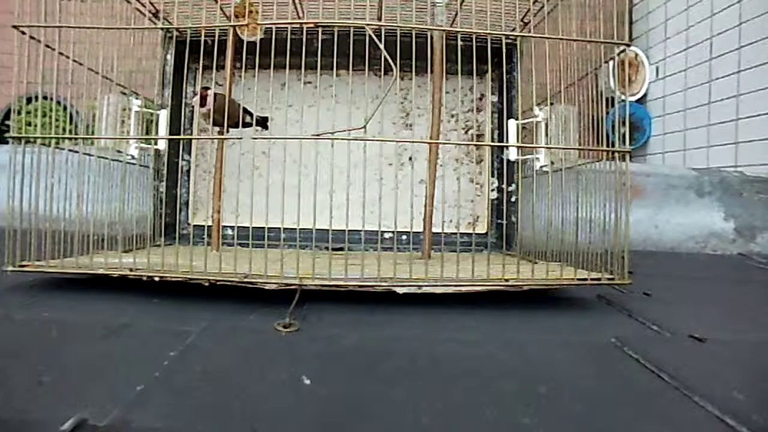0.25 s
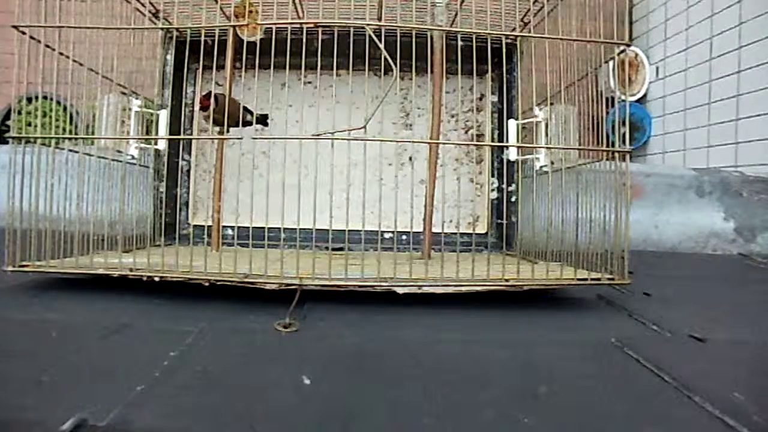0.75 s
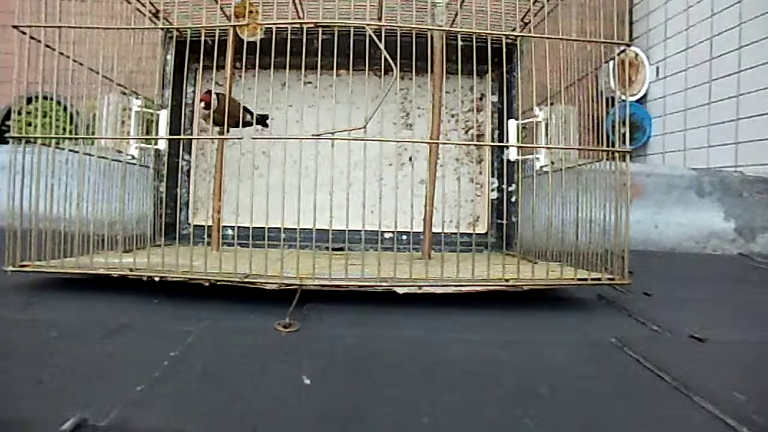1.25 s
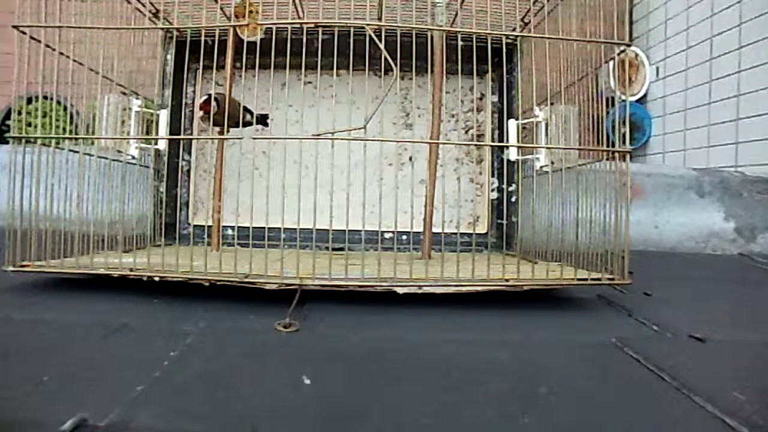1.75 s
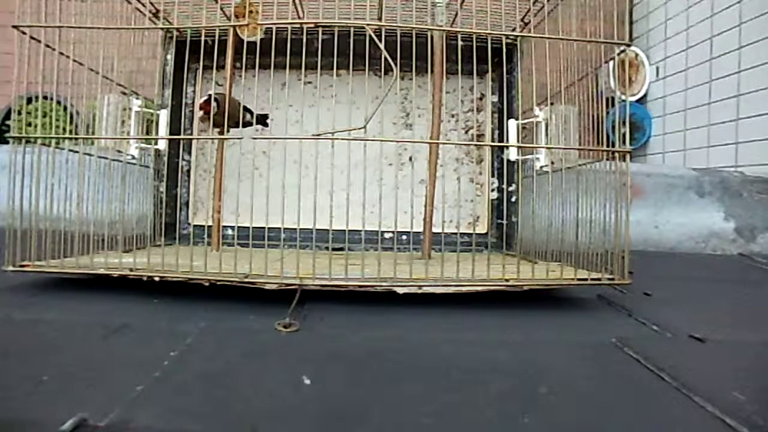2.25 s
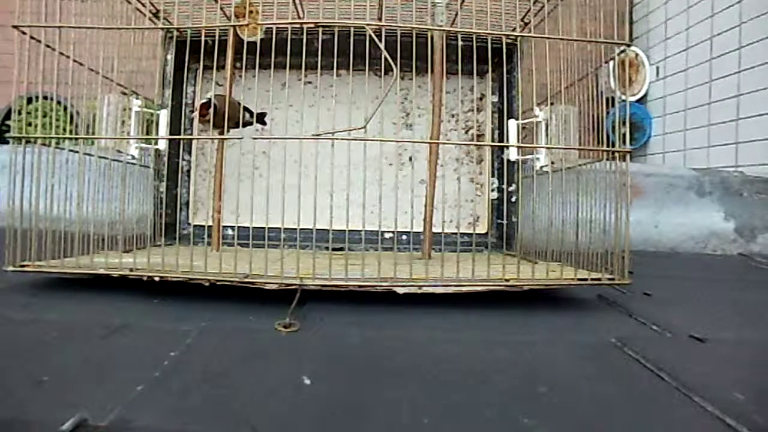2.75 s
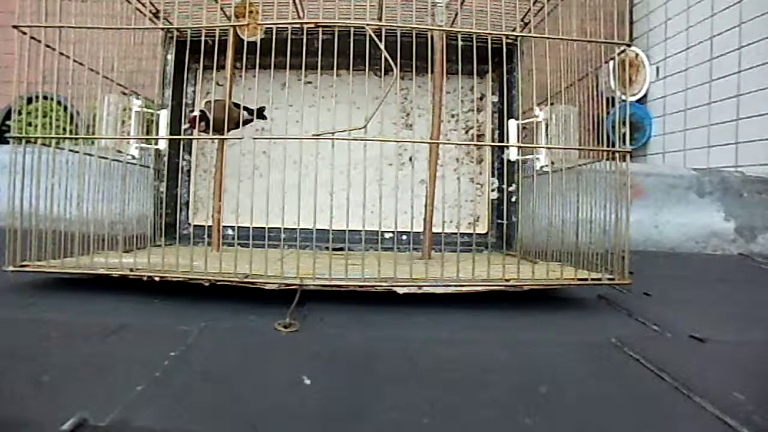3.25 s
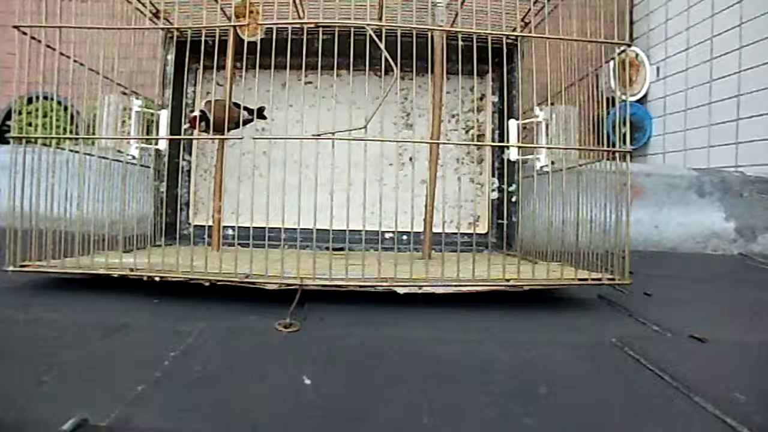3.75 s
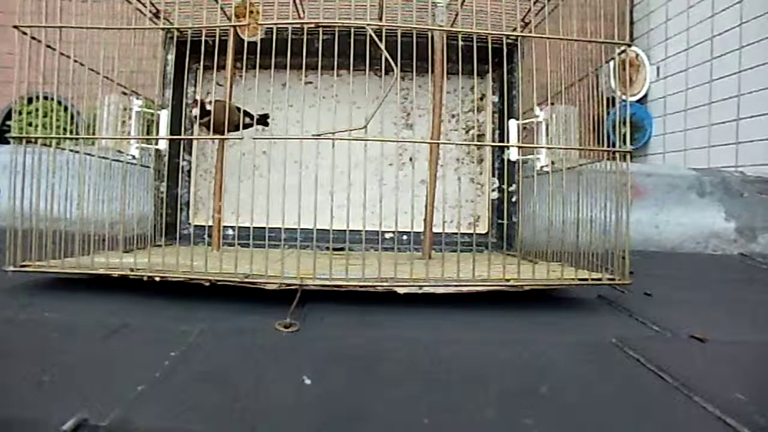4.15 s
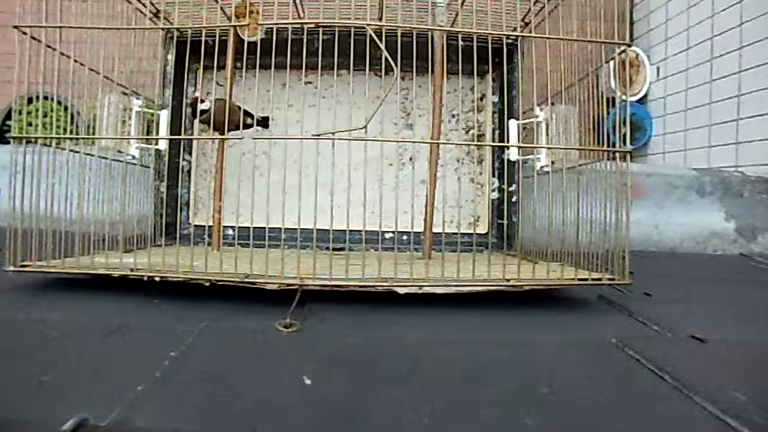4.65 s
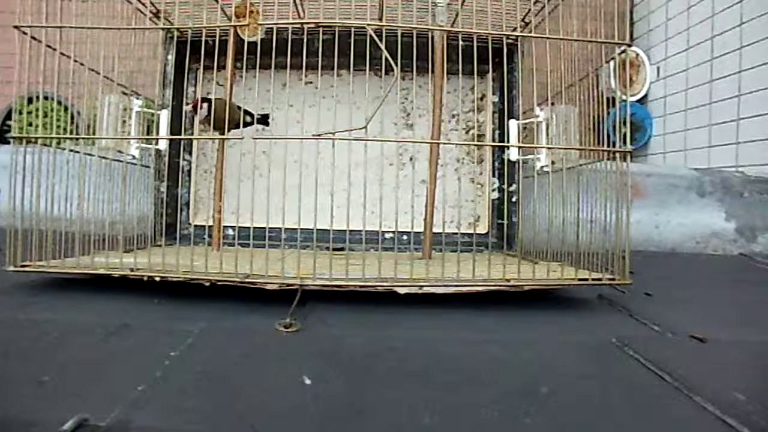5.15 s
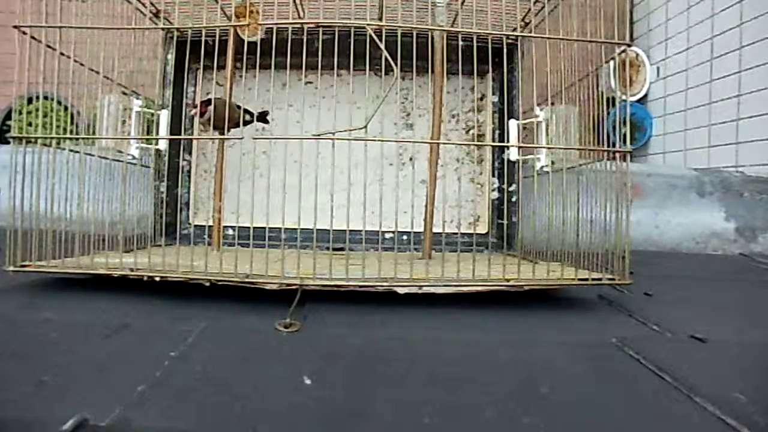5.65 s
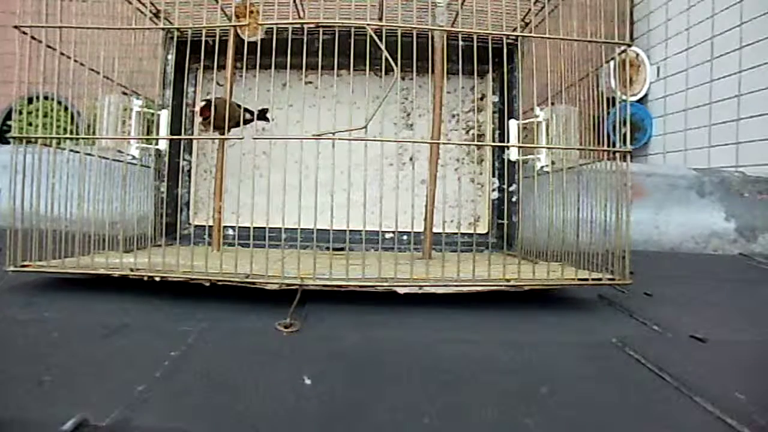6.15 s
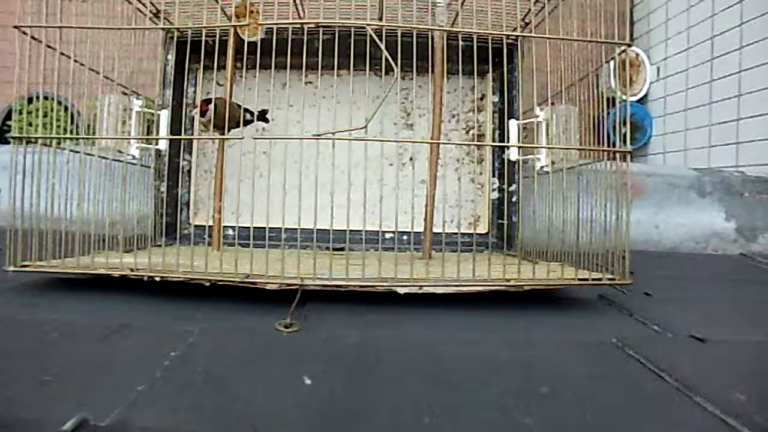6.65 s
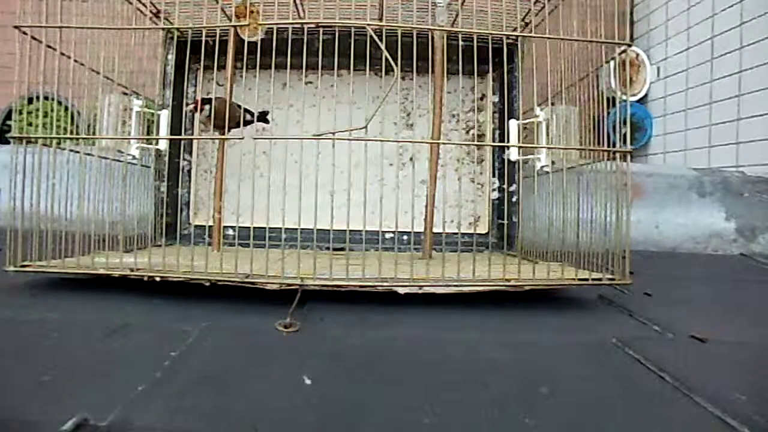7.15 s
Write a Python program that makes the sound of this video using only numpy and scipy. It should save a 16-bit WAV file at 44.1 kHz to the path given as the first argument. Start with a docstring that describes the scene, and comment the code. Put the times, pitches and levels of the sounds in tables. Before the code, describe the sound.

A caged finch close by sings a short burst of falling chirps, pauses, then a long fast twittering phrase over faint town hiss and rumble.

```python
"""A caged finch sings two phrases of fast twitter on a balcony, close by, from inside a falling sweep.
Its syrinx has two sides that whistle near-sines, at times together, with overtones and sum tones.
Cage and parapet comb the song with early echoes; random decaying taps make the reverberation.
Faint chirps are blurred glides (the first two likely a distant wall's echo of the sweep, others far birds);
town hiss and thudding air are shaped noise, an engine is a sine, converter grit rises with loud notes."""
import sys
import numpy as np
from scipy import signal
from scipy.fft import rfft, irfft, next_fast_len
from scipy.io import wavfile
from scipy.ndimage import uniform_filter1d

SR = 44100
rng = np.random.default_rng(int(sys.argv[2]) if len(sys.argv) > 2 else 0)


def wav_out(sig):
    """Save sig, one row per channel (or a flat mono array), as 16-bit PCM at SR to the path in sys.argv[1]."""
    wavfile.write(sys.argv[1], SR, np.round(np.clip(np.atleast_2d(sig).T, -1, 1) * 32767).astype(np.int16))


def volts_from_decibels(level):
    """Turn decibel levels (scalar or array-like) into linear amplitude factors."""
    exponent = np.asarray(level, float) / 20
    return 10 ** exponent


N = 325891

# flick-and-sweep syllables: (flick start [s], sweep length factor [1], level change [dB])
SWEEP_TIMES = [(-0.023, 0.99, 0.5), (0.171, 1.074, -0.55), (0.379, 1.006, -0.2), (0.566, 1.02, -0.5),
               (5.337, 1.05, 0.2), (5.53, 1.006, -0.5), (5.718, 1.04, -0.5), (5.916, 1.035, -0.3),
               (6.11, 1.065, -1.2)]
SWEEP_LAG_S = 0.0102  # from the flick's start to the sweep's start
# reverberation of the walls: (frequency [Hz], time to decay by 60 dB [s])
WALL_DECAY = [(2000, 0.14), (3200, 0.5), (3900, 0.56), (4600, 0.6), (5200, 0.54), (6000, 0.38),
              (8000, 0.15), (12000, 0.2)]


def evened(x):
    """Normalization: scales a signal to rms 1."""
    return x / np.sqrt(np.mean(x ** 2) + 1e-20)


def read(points, hz):
    """Interpolation on a logarithmic frequency axis."""
    f, value = np.transpose(points)
    return np.interp(np.log(hz + 1), np.log(f + 1), value)


def colour(x, points):
    """Linear filtering: weights the spectrum by a curve of (frequency [Hz], gain [dB])."""
    size = next_fast_len(N)
    hz = np.fft.rfftfreq(size, 1 / SR)
    return irfft(rfft(x, size) * volts_from_decibels(read(points, hz)), size)[:N]


def drift(hz):
    """Low-pass noise: slow chance up to about hz, rms 1."""
    return evened(signal.lfilter(*signal.butter(2, hz, fs=SR), rng.standard_normal(N)))


def walls(x, decay, first=300):
    """Diffuse reverberation: sparse random-sign taps from sample `first`, each band decaying at its rate."""
    taps = np.zeros(SR)
    at = np.arange(int(first), SR - 20, 20)  # one tap in every 20 samples
    taps[at + rng.integers(0, 20, len(at))] = rng.choice([-1., 1.], len(at))
    hz, t, z = signal.stft(taps, SR, nperseg=256)
    fade = volts_from_decibels(-60 * t / read(decay, hz)[:, None])
    tail = signal.istft(z * fade, SR, nperseg=256)[1]
    return signal.fftconvolve(x, tail / np.linalg.norm(tail) * 2)[:N]


def glide(shape, start_s, length_s, first_hz, last_hz, db, rich_db=0):
    """Frequency glide: pitch moves exponentially to its goal while level bends at one turning point."""
    # low notes come out weaker: (frequency [Hz], gain [dB])
    low_voice = [(1700, -13), (2300, -12), (2900, -0.5)]
    flatness = 1.85  # higher: flatter at the turning point, steeper at the ends
    settle, top, start_db, end_db = shape
    u = np.linspace(0, 1, num=17)
    top = np.clip(top, .05, .95)
    hz = first_hz + (last_hz - first_hz) * np.expm1(-settle * u) / np.expm1(-settle)
    distance = abs(u - top) / np.where(u < top, top, 1 - top)
    swell_db = np.where(u < top, start_db, end_db) * distance ** flatness
    return rich_db, np.transpose([start_s + length_s * u, hz, db + swell_db + read(low_voice, hz)])


def whistle(notes, factor, edge_s=0.0018):
    """Phasor synthesis: near-sine notes whose phase is the running sum of their frequency.

    Returns the summed phasors, their size, mean pitch, overtone size and each note's own octave."""
    tone, size, pitch = np.zeros(N, complex), np.full(N, 1e-9), np.zeros(N)
    rich, octave = np.zeros(N), np.zeros(N)
    for rich_db, rows in notes:
        s, hz, db = np.transpose(rows)
        at = np.arange(max(round((s[0] - edge_s) * SR), 0), min(round((s[-1] + edge_s) * SR), N))
        t = at / SR
        inside = np.minimum(t - s[0], s[-1] - t)
        soft = np.sin(np.pi / 2 * np.clip(inside / (2 * edge_s) + .5, 0, 1)) ** 2
        a = soft * volts_from_decibels(np.interp(t, s, db)) * np.sqrt(2)  # peak of a sine from its rms
        f = np.interp(t, s, hz) * factor[at]
        phasor = np.exp(2j * np.pi * (np.cumsum(f) / SR + rng.random()))
        tone[at] += a * phasor
        octave[at] += a * volts_from_decibels(rich_db) * (phasor ** 2).real
        size[at] += a
        pitch[at] += a * f
        rich[at] += a * volts_from_decibels(rich_db)
    return tone, size, pitch / size, rich, octave


def town():
    """Hiss of far traffic as filtered noise: time-frequency patches drift, low and middle swell slowly."""
    # spectrum of the hiss: (frequency [Hz], relative density [dB per Hz])
    hiss_spectrum = [(35, -12), (60, -0.5), (142, -6.5), (294, -10), (437, -14.5), (480, -10), (607, -16.5),
                     (882, -13.5), (1510, -20.5), (2900, -23.5), (3580, -29.5), (14600, -41.5),
                     (16000, -48)]
    # course of the low and middle hiss, used about its mean: (time [s], relative level [dB])
    hiss_swell = [(0.0, -61.5), (1.36, -61.5), (2.75, -64.5), (2.9, -62.5), (3.3, -64), (4.88, -68.5),
                  (5.64, -66.5), (7.39, -67.5)]
    frames, hz = N // 256 + 5, np.fft.rfftfreq(1024, 1 / SR)
    a, b, patches = rng.standard_normal((frames, 513, 3)).T
    patches = uniform_filter1d(patches, 8, 0)  # smooth over frequency
    patches = evened(uniform_filter1d(patches, 20, 1))  # then over time
    s, db = np.transpose(hiss_swell)
    swell_db = np.interp(np.arange(frames) * 256 / SR, s, db - db.mean())
    share = read([(1200, 1), (4000, 0.39)], hz)[:, None]  # the treble swells less
    level_db = read(hiss_spectrum, hz)[:, None] + 0.72 * patches + share * swell_db
    hiss = signal.istft((a + 1j * b) * volts_from_decibels(level_db), nperseg=1024, noverlap=768)[1][:N]
    return volts_from_decibels(-60) * evened(hiss)


def rumble():
    """A far engine's low sine, frequency-modulated and climbing overall, over low-pass noise of thudding air."""
    # engine tone: (time [s], pitch [Hz], level [dB])
    engine = [(3.7, 39.1, -55), (4.17, 43.05, -53.5), (5.61, 42.06, -53), (6.0, 42.3, -75),
              (6.1, 45.2, -53.5), (6.42, 48.9, -47.5), (6.59, 48.1, -51.5), (6.72, 48.4, -60),
              (6.9, 52.6, -54.5), (7.21, 54.4, -55.5), (7.39, 52.9, -55)]
    # thudding air: (time [s], level [dB])
    air_level = [(0.0, -54), (1.44, -57.5), (3.19, -53.5), (3.7, -53), (4.14, -58), (5.99, -56),
                 (7.39, -61)]
    t = np.arange(N) / SR
    s, hz, db = np.transpose(engine)
    turns = np.cumsum(np.interp(t, s, hz) * (1 + 0.025 * drift(5.1))) / SR
    fade_in = np.clip((t - s[0]) / 0.1, 0, 1)
    drone = np.sqrt(2) * volts_from_decibels(np.interp(t, s, db)) * fade_in * np.sin(2 * np.pi * turns)
    air_spectrum = [(8, -35), (18, 1.0), (32, 1), (55, -6.5), (90, -15), (200, -81)]
    air = evened(colour(rng.standard_normal(N), air_spectrum))
    return drone + volts_from_decibels(np.interp(t, *np.transpose(air_level))) * air


def faint_chirps():
    """Diffuse blurring: soft-edged wavering glides, faint, with reverberation added."""
    # faint chirps, the first two likely a distant wall's echo of the sweep, the others of far birds:
    # (start [s], length [s], first pitch [Hz], last pitch [Hz], relative level [dB])
    chirp_rows = [(0.763, .013, 3670, 4200, -51.5), (0.903, .025, 4300, 3970, -65),
                  (1.157, 0.024, 2670, 3180, -56), (1.161, .015, 5700, 6300, -69.5),
                  (1.192, .04, 4770, 4390, -67.5), (1.263, 0.043, 3070, 3240, -66),
                  (1.872, 0.03, 2590, 3050, -67), (3.5, 0.056, 2760, 2890, -71),
                  (3.717, 0.077, 4660, 4470, -73), (6.787, 0.019, 2990, 3200, -53)]
    # long thin whistles of far birds:
    # (start [s], length [s], first pitch [Hz], last pitch [Hz], relative level [dB])
    whistle_rows = [(2.37, .1, 5230, 4880, -80), (2.96, .12, 5330, 5500, -79), (3.27, .06, 5050, 4450, -77)]
    # course of a glide: (settling rate, negative = ever faster [1], level's turning point, held
    # within 0.05-0.95 [share of length], start level [dB], end level [dB])
    chirp_shape = (2.5, 1.2, 5, -15)
    whistle_shape = (-.8, .5, -5, -4)
    notes = [glide(chirp_shape, *row) for row in chirp_rows]
    notes += [glide(whistle_shape, *row) for row in whistle_rows]
    chirps = whistle(notes, 1 + 0.01 * drift(300), edge_s=.008)[0].real
    return volts_from_decibels(-1) * chirps + volts_from_decibels(-18) * walls(chirps, WALL_DECAY)


def place(shape, start_s, db, length=1):
    """Time scaling: sets a syllable at a time and level, stretched by a length factor."""
    return [(start_s + length * u, hz, level + db) for u, hz, level in shape]


def syllable_part(shape, start_s, change_db, part):
    """Repetition: one part of a repeated syllable as a glide with its own level change."""
    length_s, first_hz, last_hz, db, rich_db = part
    return glide(shape, start_s, length_s, first_hz, last_hz, db + change_db, rich_db)


def song():
    """Pitch and level contours: every note of the finch, and one faint late echo at 4.923 s."""
    # glides: (start [s], length [s], first pitch [Hz], last pitch [Hz], relative level [dB],
    # overtone strength [dB])
    slides = [(4.141, 0.023, 2210, 2470, -42, 9), (4.171, 0.022, 2590, 3047, -33.5, 2),
              (4.186, 0.033, 3670, 4750, -41, 3), (4.219, 0.02, 4170, 4780, -35.5, -7),
              (4.259, .041, 3880, 2710, -43.5, 8), (4.288, .019, 4040, 3490, -32, 1.5),
              (4.9, 0.016, 2200, 3950, -36, 8), (4.905, 0.013, 2620, 3060, -45, 16),
              (5.228, 0.018, 5530, 6900, -35.5, -5), (5.229, 0.032, 2574, 5300, -37, 18),
              (6.436, 0.019, 5880, 8270, -54.5, 26)]
    hooks = [(3.872, .035, 3250, 5570, -42, 8.5), (3.875, 0.028, 2935, 4890, -40.5, 10),
             (4.082, 0.028, 5450, 5075, -32, -3.5), (4.109, 0.027, 4390, 1610, -42, -1.4),
             (4.11, 0.026, 4800, 3610, -39.5, 5), (4.36, 0.02, 5620, 6830, -35, 5),
             (4.477, .016, 2670, 3175, -31.5, -1), (4.554, 0.037, 3600, 5370, -33, -4.5),
             (4.858, .028, 6600, 5470, -47, 18.5), (4.938, 0.046, 3210, 5350, -34, 2),
             (4.955, .03, 4330, 4830, -41.5, 7)]
    # the same columns; the row at 4.923 s is the faint late echo
    holds = [(4.01, 0.032, 6400, 6100, -33, -8.5), (4.152, 0.016, 3540, 3720, -40, 5),
             (4.692, 0.029, 4200, 4220, -49.5, 13), (4.858, 0.047, 8520, 6330, -33.5, -10),
             (4.923, 0.017, 6530, 6280, -58, -18), (5.037, 0.066, 5400, 5330, -35.5, 4.5),
             (5.246, 0.029, 5600, 6323, -27.5, -11)]
    # parts of repeated syllables: the same columns without the start
    flick_part = (.01, 5900, 9060, -33.5, 4)
    down_part = (.021, 4134, 2780, -33.5, 3.5)
    up_part = (.021, 4540, 5330, -33, -3.5)
    # course of each kind: (settling rate [1], level's turning point, held within 0.05-0.95
    # [share of length], start level [dB], end level [dB])
    slide_shape = (0.16, 1, -8.5, -14)
    hook_shape = (2, 0.62, -6, -17.5)
    hold_shape = (5, 0.5, -9, -16)
    flick_shape = (.1, .5, -10.5, -7)
    down_shape = (.6, .25, -16, -6)
    up_shape = (1.2, .25, -10.5, -7)
    # the long falling sweep: (time from its start [s], pitch [Hz], relative level [dB])
    sweep_shape = [(0, 6700, -74), (.01, 6100, -40), (.018, 5537, -35), (.027, 4860, -36.5),
                   (.037, 4460, -33), (.047, 4120, -32), (.072, 3510, -32.5), (.083, 3170, -37),
                   (.095, 2846, -36.5), (.128, 2270, -56.5)]
    # trills, a down note then an up note: (start [s], level change [dB])
    trills = [(6.864, -1), (6.936, -0.3), (7.009, 0.4), (7.079, 0.6), (7.15, 0.2), (7.223, 0.3),
              (7.296, 0.8), (7.369, 3)]
    # freely bent notes: (overtone strength [dB], rows of (time [s], pitch [Hz], relative level [dB]))
    bends = [(-1, [(3.953, 2660, -45), (3.967, 3010, -41), (3.978, 3400, -36.5), (3.986, 4630, -35.5),
             (3.994, 5260, -39.5), (4.002, 5060, -50)]), (-1, [(4.238, 8500, -50), (4.242, 7140, -39),
             (4.246, 7530, -34), (4.252, 7250, -47), (4.26, 5740, -49), (4.27, 4800, -42),
             (4.285, 4620, -40)]), (-1.5, [(4.364, 5150, -48), (4.372, 5690, -41), (4.392, 5710, -32),
             (4.41, 5640, -39), (4.43, 5650, -45.5)]), (-3.5, [(4.6, 6000, -44), (4.613, 6230, -32.5),
             (4.635, 6020, -47), (4.655, 5600, -44.5), (4.668, 5116, -25.5), (4.685, 5060, -31),
             (4.705, 5005, -43.5), (4.722, 5000, -43)]), (-0.5, [(4.772, 2520, -54), (4.785, 2987, -35.5),
             (4.8, 3614, -30), (4.815, 4000, -34)]), (1.5, [(5.03, 7930, -52), (5.038, 6540, -45),
             (5.06, 6400, -29.5), (5.078, 6510, -30), (5.09, 7200, -37), (5.107, 7600, -52)]),
             (2.5, [(5.118, 4476, -62), (5.13, 3910, -32.5), (5.16, 2796, -31.5), (5.172, 2440, -43.5),
             (5.185, 2090, -66)]), (23, [(6.354, 2820, -64), (6.362, 4360, -53.5), (6.372, 5540, -54),
             (6.382, 5570, -45), (6.395, 5160, -47), (6.408, 5160, -54)]), (11, [(6.362, 5560, -59),
             (6.372, 6450, -40), (6.382, 6700, -43), (6.395, 6280, -39.5), (6.412, 6400, -78)]),
             (-1, [(6.432, 1793, -58), (6.44, 3250, -40.5), (6.45, 3900, -32.5), (6.462, 4360, -38),
             (6.474, 4184, -55)]), (-4.5, [(6.577, 8700, -60), (6.59, 8480, -38), (6.62, 8350, -41),
             (6.65, 7050, -32.5), (6.67, 6310, -29.5), (6.7, 6120, -36), (6.74, 5910, -34),
             (6.775, 5810, -32), (6.815, 6150, -36)])]
    sweep_rich_db, trill_lag_s = 5, .0267
    notes = []
    for shape, rows in [(slide_shape, slides), (hook_shape, hooks), (hold_shape, holds)]:
        notes += [glide(shape, *row) for row in rows]
    for s, length, db in SWEEP_TIMES:
        notes.append(syllable_part(flick_shape, s, db, flick_part))
        notes.append((sweep_rich_db, place(sweep_shape, s + SWEEP_LAG_S, db, length)))
    for s, db in trills:
        notes.append(syllable_part(down_shape, s, db, down_part))
        notes.append(syllable_part(up_shape, s + trill_lag_s, db, up_part))
    return notes + bends


def warble():
    """Frequency modulation: regular shakes and rough patches over a slight unsteadiness of pitch."""
    # shakes: (from [s], to [s], highest at [s], rate [Hz], depth [share of pitch], random [share of pitch])
    shakes = [(3.872, 3.905, 3.88, 250, .01, .02), (4.109, 4.134, 4.12, 300, .02, .1),
              (5.035, 5.09, 5.0665, 140, .055, .015), (5.228, 5.25, 5.235, 250, .03, .07),
              (6.612, 6.82, 6.732, 99.7, .03, .004)]
    # shake within each sweep: (from [s], to [s], rate [Hz], depth [share of pitch], random [share of pitch])
    sweep_shake = (.03, .105, 320, .022, .012)
    t = np.arange(N) / SR
    factor = 1 + 0.0091 * drift(330)
    chance = drift(880)
    start, end, *shake = sweep_shake
    sweep_starts = np.array(SWEEP_TIMES)[:, 0] + SWEEP_LAG_S
    in_sweeps = [(s + start, s + end, s, *shake) for s in sweep_starts]
    for start, end, top, rate_hz, depth, rough in shakes + in_sweeps:
        on = np.clip(np.minimum(t - start, end - t) / 0.0012, 0, 1)
        factor += on * (depth * np.cos(2 * np.pi * rate_hz * (t - top)) + rough * chance)
    return factor


def finch():
    """Nonlinear source: powers of the summed whistles give overtones, and sum tones of two voices at once."""
    # overtones 2 to 5 against the whistle: (relative level [dB])
    order_levels = [-7.5, -18.5, -25, -31]
    # overtone colour of the beak: (frequency [Hz], gain [dB])
    beak = [(2000, -28), (5000, -18), (7000, -22), (8500, -14.5), (10000, -8), (12000, 0.5), (14000, -9.5),
            (16000, -24)]
    coupling = 0.52  # share of the second overtone that two voices make jointly, 0-1
    tone, size, pitch, rich, octave = whistle(song(), warble())
    tremble = volts_from_decibels(1.3 * drift(250))  # a quick uneven tremble in loudness
    over = np.zeros(N)
    for k, db in enumerate(order_levels, 2):
        audible = np.clip((20000 - k * pitch) / 2000, 0, 1)  # fades out from 18 to 20 kHz
        joint = rich * ((tone / size) ** k).real
        share = coupling if k == 2 else 1
        over += volts_from_decibels(db) * audible * (share * joint + (1 - share) * octave)
    return tremble * tone.real + colour(tremble * over, beak)


def cage(x):
    """Comb filtering: single echoes within milliseconds interfere with the song."""
    # cage floor, bars and parapet: (delay [ms], relative gain [1])
    echoes = [(.55, 0.042), (.719, 0.28), (1.357, 0.24), (1.523, -0.5), (2.21, -0.23), (2.568, -0.13),
              (3.025, 0.19), (3.455, 0.13), (3.981, 0.3), (4.184, 0.24), (4.995, -0.11), (6.665, -0.079),
              (6.86, 0.11), (7.953, 0.3), (8.862, 0.018), (10.702, -0.046), (12.726, -0.19)]
    size = next_fast_len(N + 1000)
    hz = np.fft.rfftfreq(size, 1 / SR)
    path = sum(g * np.exp(-2j * np.pi * hz * ms / 1000) for ms, g in echoes)
    return irfft(rfft(x, size) * path, size)[:N]


def scene():
    """Superposition: bird in its cage, the walls around, the town behind."""
    # what a bounce keeps: (frequency [Hz], gain [dB])
    bounce_colour = [(2000, -4.5), (6500, -1), (9000, -16), (12000, -15), (16000, -23)]
    # the corner round the cage: (frequency [Hz], time to decay by 60 dB [s])
    nook_decay = [(2000, 0.074), (6000, 0.042), (12000, 0.052)]
    bird = finch()
    bounced = colour(bird, bounce_colour)
    near = volts_from_decibels(-1.0) * (bird + cage(bounced))
    nook = volts_from_decibels(-12.0) * walls(bounced, nook_decay, first=150)
    room = nook + volts_from_decibels(-23.5) * walls(bounced, WALL_DECAY)
    return (near + room + faint_chirps() + town() + rumble())[None]


def top_cut(x):
    """Nothing passes above the cut-off."""
    return signal.sosfilt(signal.butter(12, 16640, fs=SR, output="sos"), x)


def record(dry):
    """Adaptive quantization noise: the converter's step follows the signal's slope, so grit swells with notes."""
    # spectrum of the grit: (frequency [Hz], relative level [dB])
    grit_colour = [(100, 8), (1500, 3.5), (5000, 4), (9000, 4.5), (16000, 3)]
    slope = np.diff(dry[0], prepend=0)
    step = np.sqrt(abs(uniform_filter1d(slope ** 2, 160)))
    noise = evened(colour(rng.standard_normal(N), grit_colour))
    grit = (volts_from_decibels(-18) * step + volts_from_decibels(-81)) * noise
    offset = .0067  # steady shift of the converter
    return top_cut(dry + grit + offset)


dry = scene()
out = record(dry)
wav_out(out)
```